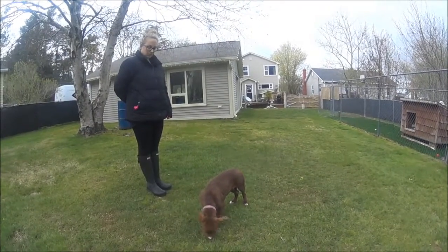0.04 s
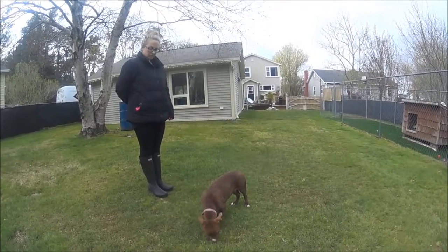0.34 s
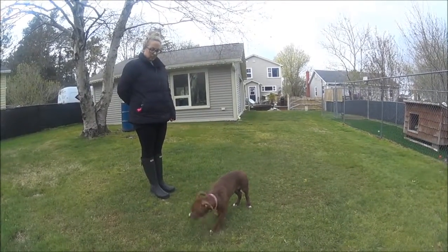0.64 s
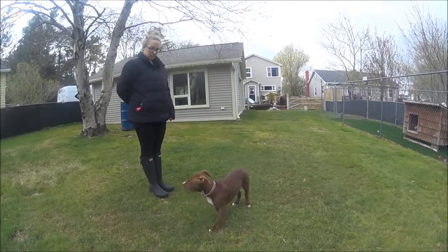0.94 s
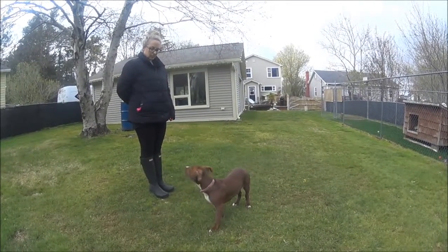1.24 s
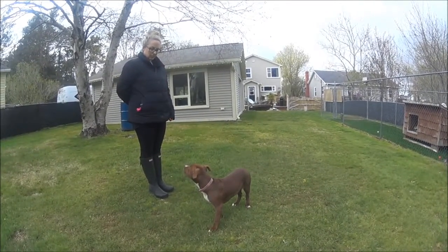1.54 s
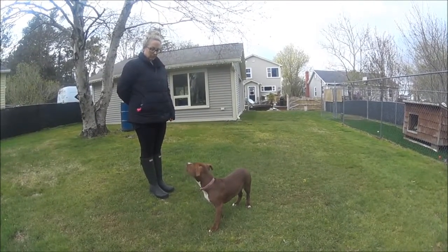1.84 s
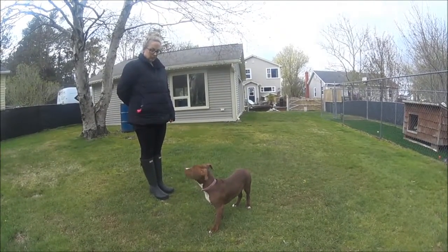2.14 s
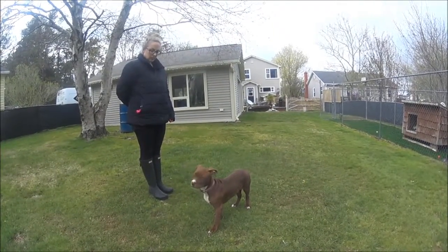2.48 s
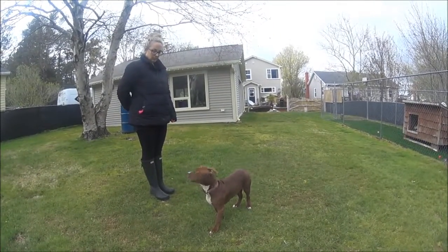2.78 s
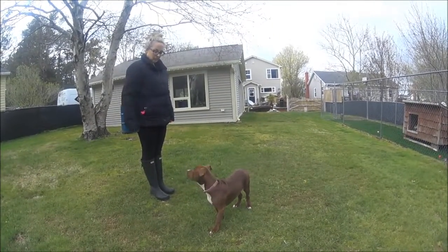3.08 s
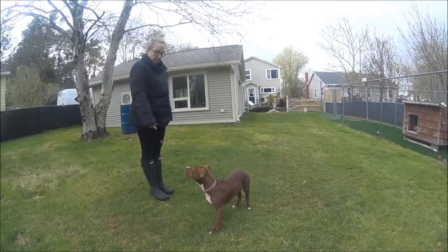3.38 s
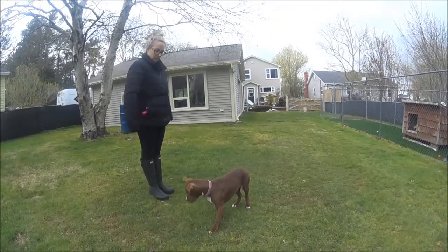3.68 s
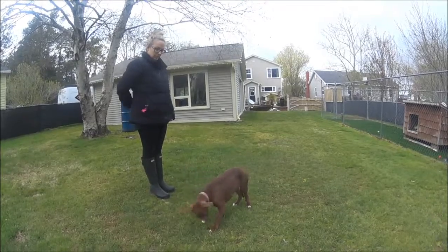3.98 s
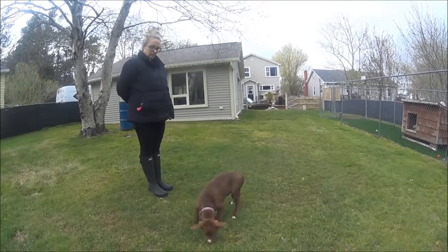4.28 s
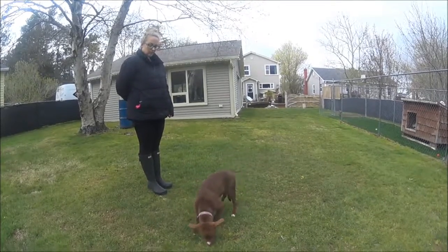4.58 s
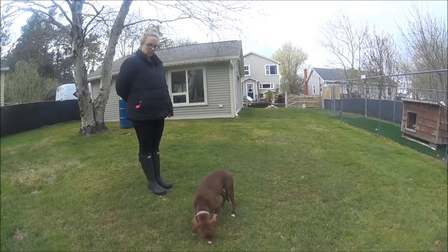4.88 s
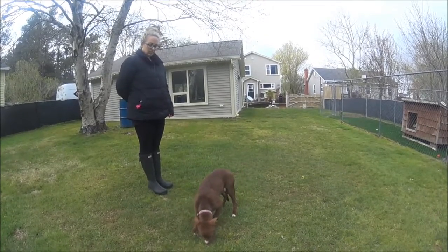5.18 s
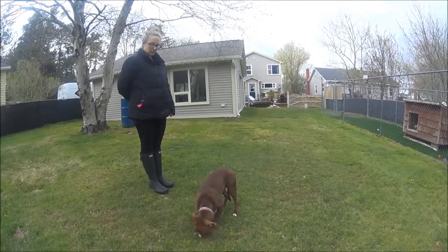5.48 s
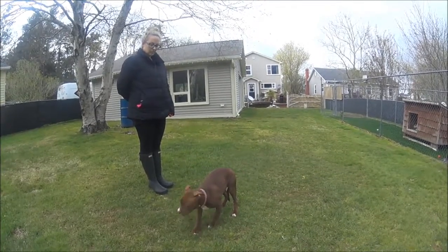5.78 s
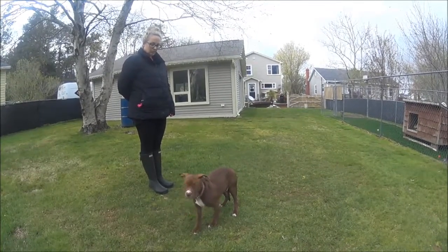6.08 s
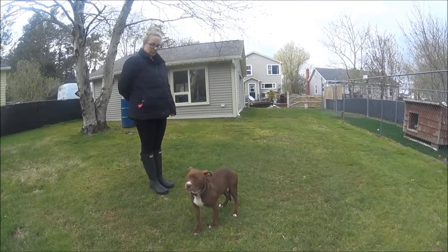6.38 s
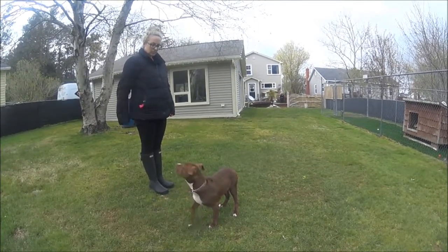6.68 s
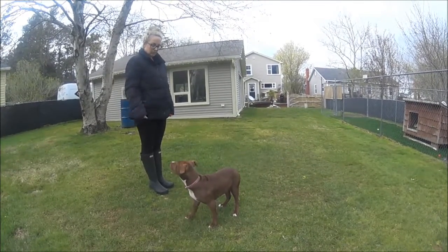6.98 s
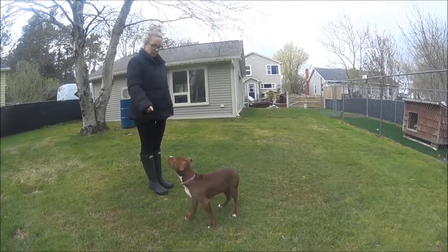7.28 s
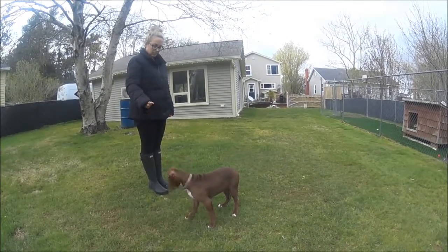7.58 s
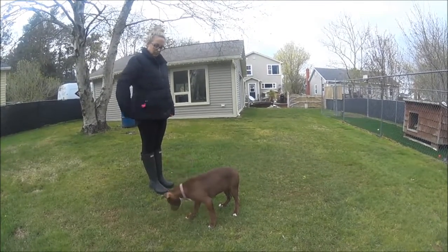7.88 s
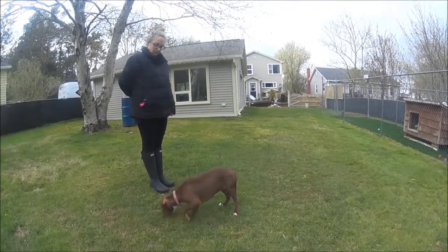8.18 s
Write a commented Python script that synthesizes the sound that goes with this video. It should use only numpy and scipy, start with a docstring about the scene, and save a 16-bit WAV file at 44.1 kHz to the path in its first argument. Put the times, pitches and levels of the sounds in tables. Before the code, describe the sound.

A small metal training clicker is worked twice, nearly four seconds apart, each time making a crisp pair of snaps that bounce briefly off a house and fences. It is a few metres away and much louder than anything else. Soft nylon sleeve swishes follow each pair, with faint jacket rustles between them. Behind it all are a steady open-air hush and far birds whistling in short bouts.

```python
"""Far birds whistle over the steady outdoor hush of a quiet backyard.
A dog trainer's padded jacket rustles and swishes by friction as she reaches for a treat.
A few metres away she works a clicker twice: its steel tongue buckles down and back up,
each snap ringing the damped modes of tongue and case. The lawn, house and fences reflect each snap."""
import sys
import numpy as np
from scipy import signal
from scipy.fft import rfft, irfft, next_fast_len
from scipy.io import wavfile

SR = 44100
rng = np.random.default_rng(int(sys.argv[2]) if len(sys.argv) > 2 else 0)


def pcm_store(signal):
    """Save signal as 16-bit PCM."""
    levels = np.round(np.clip(np.atleast_2d(signal), -1, 1) * 32767)
    wavfile.write(sys.argv[1], SR, levels.astype(np.int16).T)


N = 362943
TIME = np.arange(N) / SR

# Levels in the tables are relative: each source applies its own gain.
# spectra of the hush, in phase and in antiphase at the two ears: f/Hz, spectral level/dB
HUSH_IN_PHASE = [(12, -41), (20, -3.5), (194, -0.5), (246, -1.5), (365, -2), (451, -3.5), (514, -3.5),
                 (587, -4.5), (688, -5), (1230, -8.5), (1830, -6), (1980, -6.5), (4850, -14), (5990, -15),
                 (11000, -23.5), (14300, -78), (22000, -120)]
HUSH_ANTIPHASE = [(12, -56), (20, -19), (61, -18.5), (153, -8.5), (337, -3), (451, -4.5), (501, -1),
                  (587, -4.5), (670, -2.5), (1640, -7.5), (2260, -11), (2510, -5.5), (2940, -13),
                  (7020, -21), (11000, -26.5), (14300, -60), (22000, -120)]
# bouts of the distant chorus: start/s, end/s
CHORUS_BOUTS = [(-.5, 1.2), (3.55, 6.6), (7.9, 8.6)]
# arched bird calls: t/s, top f/Hz, level/dB
BIRD_ARCHES = [(4.02, 1390, -69.5), (4.295, 1410, -73), (4.75, 1358, -69), (4.94, 2300, -65)]
# thin high bird chips: t/s, starting f/Hz, level/dB
BIRD_CHIPS = [(.60, 6600, -74), (5.415, 6970, -67)]
# syllables of the whistled song: t/s, length/s, held f/Hz, starting offset from it/Hz, level/dB
SONG_SYLLABLES = [(-.14, 0.36, 2900, 0, -60.5), (0.017, .2, 2266, -300, -65), (.64, 0.23, 2894, -400, -61),
                  (0.677, 0.16, 3390, 0, -66.5), (0.969, .13, 2183, 201, -58.5),
                  (3.53, 0.15, 2660, -800, -67), (3.66, 0.21, 2957, -400, -62),
                  (4.135, .32, 2870, -85, -58), (4.242, .16, 2210, 100, -63.5),
                  (4.78, 0.37, 2948, -1, -60.5), (5.029, .18, 2290, -1, -59.5), (5.08, .17, 2556, 150, -61),
                  (5.457, 0.27, 2825, 298, -58), (5.859, 0.31, 2850, 198.5, -60.5),
                  (6.161, 0.16, 2990, -4, -65), (6.185, .08, 2270, -380, -63), (7.801, 0.26, 2880, -2, -68),
                  (8.02, .16, 2220, 202, -63)]
# spectrum of rustling cloth: f/Hz, spectral level/dB
CLOTH_SPECTRUM = [(900, -29), (1400, -20), (1800, -3), (2900, 2.5), (4000, -4.5), (4600, -6.5),
                  (5400, -1.5), (6400, -12.5), (7500, -10), (9000, -16), (11000, -15)]
# soft rustles of the jacket: t/s, half-width/s, level/dB, treble over bass/dB
JACKET_RUSTLES = [(0.499, 0.023, -56, -2), (0.572, 0.045, -63, 0), (4.496, 0.015, -64.5, 15),
                  (4.688, 0.048, -63.5, 8.5), (4.74, 0.039, -51, -2), (4.822, .025, -62, -2),
                  (5.166, 0.011, -63, -10), (5.306, 0.027, -63.5, -15), (5.64, 0.043, -54.5, 4),
                  (5.73, 0.044, -59.5, -6)]
# sleeve sliding over the jacket: t/s, speeding up/s, slowing/s, thread-crossing f/Hz at first,
# thread-crossing f/Hz at top speed, level/dB at top speed, hiss/dB
SLEEVE_STROKES = [(2.836, .225, 0.05, 1550, 7300, -58, 4.5), (3.858, 0.026, .022, 5700, 6770, -48.5, -5),
                  (3.906, .014, 0.023, 7000, 7680, -60, -3), (6.488, .014, 0.015, 2000, 2296, -50.5, -5),
                  (6.505, 0.16, 0.029, 3500, 6170, -59, 2), (6.672, 0.0175, 0.025, 7300, 8040, -55.5, -3.5),
                  (6.704, .026, 0.017, 7000, 7300, -51.5, -2.5)]
# echoes from house, trees and fences: delay/ms, level/dB
YARD_ECHOES = [(10.5, -33), (22.0, -22.5), (27.3, -23.5), (39.7, -37), (46.0, -33), (52.5, -30),
               (63.6, -32)]
# modes of tongue and case, held down and relaxed: f/Hz, level/dB, T60/s
BENT_MODES = [(3320, -40, .012), (4140, -32.5, 0.016), (4800, -31, .012), (5320, -26, .011),
              (6280, -25.5, 0.0061), (6456, -15.5, 0.014), (7110, -21, 0.033), (8130, -23.5, 0.014),
              (9460, -14, 0.0017), (10820, -30, 0.0094)]
RELAXED_MODES = [(2664, -39.5, 0.017), (4200, -56, .008), (4680, -36, 0.016), (5300, -10, 0.0081),
                 (6200, -26, 0.014), (7590, -25, 0.0066), (9900, -28, 0.013), (10730, -25.5, 0.02)]
# the tongue snaps down, then up: t/s, level/dB, delay to its stop/ms, amplitude ratio of that impact
DOWN_SNAPS = [(2.734, -2.5, 0.2, 0.49), (6.3616, -3, 0.2, 0.54)]
UP_SNAPS = [(2.9222, 0.93, 0.405, 0.31), (6.5042, 1.3, 0.416, 0.15)]


def from_db(db):
    """Amplitude ratio for a level in decibels."""
    return 10 ** (np.asarray(db) / 20)


def unit_rms(x):
    """Normalise to rms 1."""
    return x / np.sqrt(np.mean(x ** 2) + 1e-20)


def cut(x, hz, kind, order=2):
    """Butterworth low- or high-pass."""
    return signal.sosfilt(signal.butter(order, hz, kind, fs=SR, output="sos"), x + 1e-18)


def noise(spectrum):
    """Spectral shaping colours white noise; rms 1."""
    size = next_fast_len(N)
    hz, db = np.transpose(spectrum)
    bins = np.maximum(np.fft.rfftfreq(size, 1 / SR), 1)
    gain = from_db(np.interp(np.log(bins), np.log(hz), db))
    return unit_rms(irfft(rfft(rng.standard_normal(size)) * gain, size)[:N])


def drift(rate_hz, size):
    """Band-limited random fluctuation, rms 1."""
    return unit_rms(cut(rng.standard_normal(size + SR // 4), rate_hz, "low")[-size:])


def add(out, s, x):
    """Superpose x on out from time s on."""
    start = max(round(s * SR), 0)
    out[..., start:start + x.shape[-1]] += x[..., :N - start]


def delayed(x, ms):
    """A linear phase shift delays a short sound by any fraction of a sample."""
    hz = np.fft.rfftfreq(len(x), 1 / SR)
    return irfft(rfft(x) * np.exp(-2j * np.pi * hz * ms / 1000), len(x))


def placed(x, right_db):
    """An interaural level difference leans a sound to the right."""
    return x * from_db([[-right_db / 2], [right_db / 2]])


def scatter(x, t60, build_s):
    """Diffuse scattering: countless weak returns from branches and fences, different at each ear."""
    t = np.arange(SR) / SR
    tail = rng.standard_normal((2, SR)) * from_db(-60 * t / t60) * (1 - np.exp(-t / build_s))
    tail /= np.sqrt(np.sum(tail[0] ** 2))
    return signal.fftconvolve(x[None], tail, axes=1)[:, :N]


def hush():
    """Far traffic and air in the trees: low interaural coherence makes the steady noise very wide."""
    in_phase = from_db(-62.15) * noise(HUSH_IN_PHASE)
    antiphase = from_db(-59.5) * noise(HUSH_ANTIPHASE)
    return np.array([in_phase + antiphase, in_phase - antiphase])


def chorus(lull_db=-76, bout_rise_db=7, fade_s=.25):
    """Incoherent summation merges the farthest birds into a noise band that swells in each bout."""
    chatter = noise([(1700, -38), (2200, -4.5), (2550, 1), (2900, -2.5), (3150, -9), (4000, -27)])
    singing = sum(np.clip(.5 + np.minimum(TIME - start, end - TIME) / fade_s, 0, 1)
                  for start, end in CHORUS_BOUTS)
    return from_db(lull_db + bout_rise_db * singing + 2.5 * drift(12, N)) * chatter


def whistle(s, length, pitch, db, waver, flutter_db, third_db):
    """A nearly pure tone follows pitch(t), with random frequency and amplitude modulation."""
    out, now = np.zeros(N), (TIME >= s) & (TIME < s + length)
    t = TIME[now] - s
    hz = pitch(t) * (1 + waver * drift(87, len(t)))
    phase = 2 * np.pi * np.cumsum(hz) / SR
    swell = np.sqrt(np.abs(np.sin(np.pi * t / length)))
    gain = from_db(db + flutter_db * drift(36, len(t)))
    out[now] = swell * gain * (np.sin(phase) + from_db(third_db) * np.sin(3 * phase))
    return out


def bird_calls(arch_s=.115, arch_depth=.16, chip_s=.026, fall_hz_per_s=6000):
    """Frequency sweeps: a parabola gives an arched call, a short linear fall gives a chip."""
    out = np.zeros(N)
    for s, hz, db in BIRD_ARCHES:
        pitch = lambda t: hz * (1 - arch_depth * (2 * t / arch_s - 1) ** 2)
        out += whistle(s, arch_s, pitch, db, waver=.01, flutter_db=3, third_db=-15)
    for s, hz, db in BIRD_CHIPS:
        pitch = lambda t: hz - fall_hz_per_s * t
        out += whistle(s, chip_s, pitch, db, waver=.01, flutter_db=5, third_db=-70)
    return out


def songbird(slide_s=.055, hold_s=.2, sag_hz_per_s=2200):
    """Each syllable relaxes exponentially onto a held frequency, then sags if it lasts."""
    out = np.zeros(N)
    for s, length, hz, offset_hz, db in SONG_SYLLABLES:
        pitch = lambda t: hz + offset_hz * np.exp(-t / slide_s) - sag_hz_per_s * np.maximum(t - hold_s, 0)
        out += whistle(s, length, pitch, db, waver=.022, flutter_db=3, third_db=-50)
    return out


def birds():
    """At long range much of the sound arrives by scattering from the trees."""
    song, calls, chatter = songbird(), bird_calls(), chorus()
    direct = from_db(-2) * song + from_db(2.5) * calls + chatter
    return direct + from_db(-1.5) * scatter(song + .4 * calls + .6 * chatter, t60=.67, build_s=.018)


def rustles(grain_db=2, split_hz=3660):
    """Friction noise: small shifts of the arms give short, grainy puffs from the cloth."""
    cloth = unit_rms(noise(CLOTH_SPECTRUM) * from_db(grain_db * drift(130, N)))
    low, high = cut(cloth, split_hz, "low", order=3), cut(cloth, split_hz, "high", order=3)
    out = np.zeros(N)
    for s, half_width, db, bright_db in JACKET_RUSTLES:
        now = np.abs(TIME - s) < 4 * half_width
        swell = from_db(db) * np.exp(-((TIME[now] - s) / half_width) ** 2)
        out[now] += swell * (from_db(-bright_db / 2) * low[now] + from_db(bright_db / 2) * high[now])
    return out


def swishes(roughness=.05, slowing_loss=.14, db_per_octave=2, attack_s=.011, release_s=.019):
    """Woven nylon sings at its thread-crossing frequency, so pitch and level rise with arm speed."""
    out = np.zeros(N)
    hiss = noise([(1200, -13), (2500, -3), (3800, -6.5), (5200, -3),
                  (7000, 2.5), (9000, -4), (10500, -2.5)])
    for s, rise_s, slow_s, first_hz, top_hz, db, hiss_db in SLEEVE_STROKES:
        length = rise_s + slow_s
        now = (TIME >= s) & (TIME < s + length)
        t = TIME[now] - s
        speed = np.interp(t, [0, rise_s, length], [first_hz / top_hz, 1, 1 - slowing_loss])
        contact = np.minimum(t / attack_s, 1) * np.minimum((length - t) / release_s, 1)
        crossing_hz = top_hz * speed * (1 + roughness * drift(250, len(t)))
        phase = 2 * np.pi * np.cumsum(crossing_hz) / SR
        # two folds of the sleeve rub at slightly different speeds, each gripping unevenly
        grips = [1 + .7 * drift(300, len(t)) for fold in range(2)]
        zip_tone = unit_rms(np.sin(phase) * grips[0] + .55 * np.sin(.8 * phase) * grips[1])
        gain = contact * from_db(db - 1 + db_per_octave * np.log2(speed))
        out[now] += gain * (zip_tone + speed * from_db(hiss_db + 1.5) * hiss[now])
    return out


def jacket():
    """Cloth friction is heard directly, with a weaker diffuse field from the yard."""
    direct = swishes() + rustles()
    return placed(direct, right_db=2.5) + from_db(-7.5) * scatter(direct, t60=.22, build_s=.0064)


def cracks(gain_db, low_hz, high_hz):
    """Directivity: each snap's toneless crack radiates away from the listener, into the yard."""
    out = np.zeros(N)
    for s, db, _, _ in DOWN_SNAPS + UP_SNAPS:
        add(out, s, from_db(db + gain_db) * rng.standard_normal(SR // 500))
    return cut(cut(out, low_hz, "high"), high_hz, "low")


def yard_echoes(x):
    """Discrete reflections: each has its own direction, so delay and level differ between the ears."""
    echoes = np.zeros((2, N))
    for ms, db in YARD_ECHOES:
        for ear in echoes:
            delay_s = (ms + rng.uniform(-.2, .2)) / 1000
            add(ear, delay_s, from_db(db + rng.normal(0, 1)) * x)
    return echoes


def snaps(events, modes, gain_db, case_hz, lawn_ms, lawn_share):
    """Buckling and the impact on the stop excite damped modes; the lawn adds a duller image source."""
    out, t = np.zeros(N), np.arange(SR // 10) / SR
    ring = sum(from_db(db - 60 * t / t60) * np.sin(2 * np.pi * hz * t) for hz, db, t60 in modes)
    for s, db, stop_ms, stop_share in events:
        snap = ring + stop_share * delayed(ring, stop_ms)
        mirrored = cut(delayed(snap, lawn_ms), 12000, "low", order=1)
        add(out, s, from_db(db + gain_db) * (snap + lawn_share * mirrored))
    return cut(out, case_hz, "high", order=5)   # so small a case radiates no bass


def clicker():
    """Both strokes of the tongue arrive as direct sound, early reflections and a diffuse tail."""
    down = snaps(DOWN_SNAPS, BENT_MODES, gain_db=-1.1, case_hz=2480, lawn_ms=1.747, lawn_share=.69)
    up = snaps(UP_SNAPS, RELAXED_MODES, gain_db=-1.94, case_hz=2950, lawn_ms=1.728, lawn_share=.57)
    clicks = down + up
    into_yard = from_db(-3.5) * cut(clicks, 7400, "low") + cracks(gain_db=-18, low_hz=2960, high_hz=6300)
    echoes = yard_echoes(into_yard)
    tail = from_db(-16) * scatter(into_yard, t60=.53, build_s=.0056)
    direct = np.array([cut(clicks, 12000, "low", order=1), clicks])   # a little duller on the left
    return placed(direct, right_db=2.6) + placed(echoes, right_db=1) + tail


def scene():
    """Superposition of clicker, jacket and birds on the hush."""
    return clicker() + jacket() + birds() + hush()


def record(dry):
    """Band limiting: an elliptic low-pass cuts the top treble steeply."""
    return signal.sosfilt(signal.ellip(10, .3, 70, 11080, fs=SR, output="sos"), dry)


dry = scene()
out = record(dry)
pcm_store(out)
```